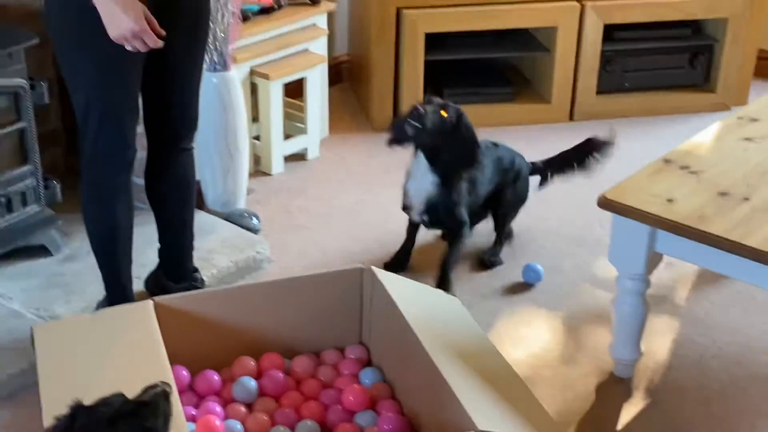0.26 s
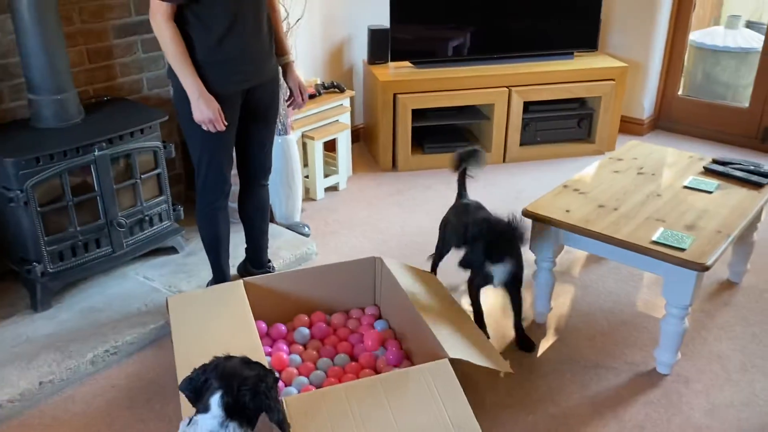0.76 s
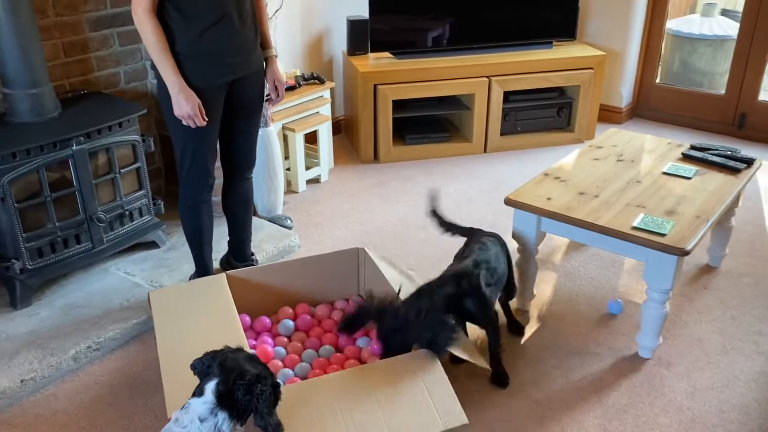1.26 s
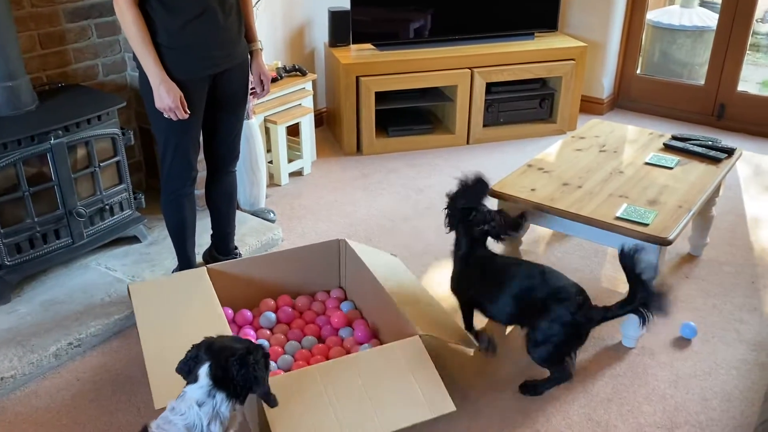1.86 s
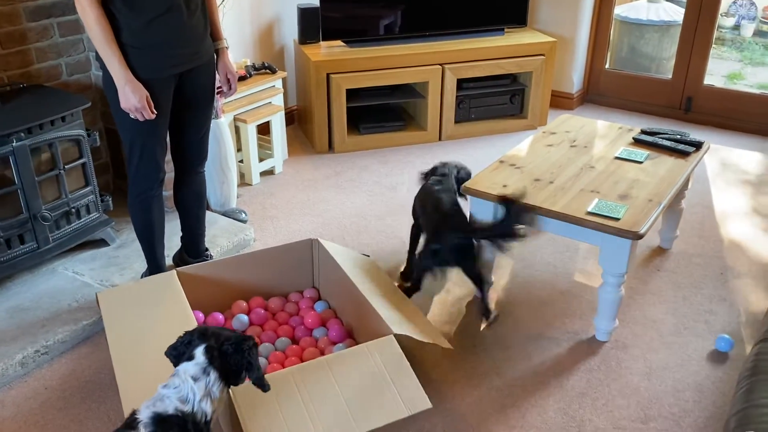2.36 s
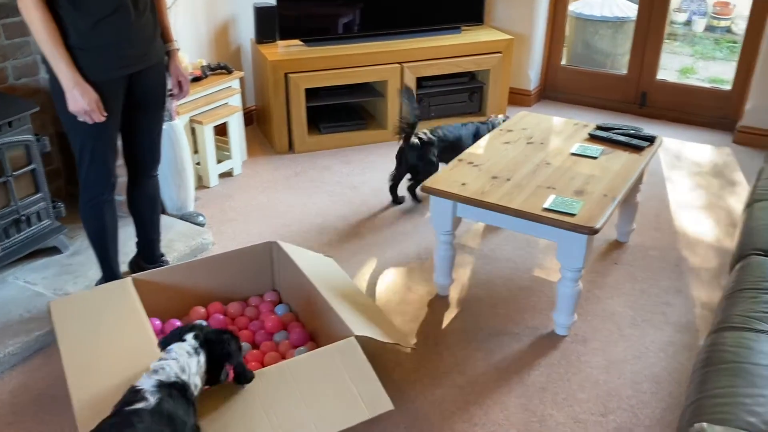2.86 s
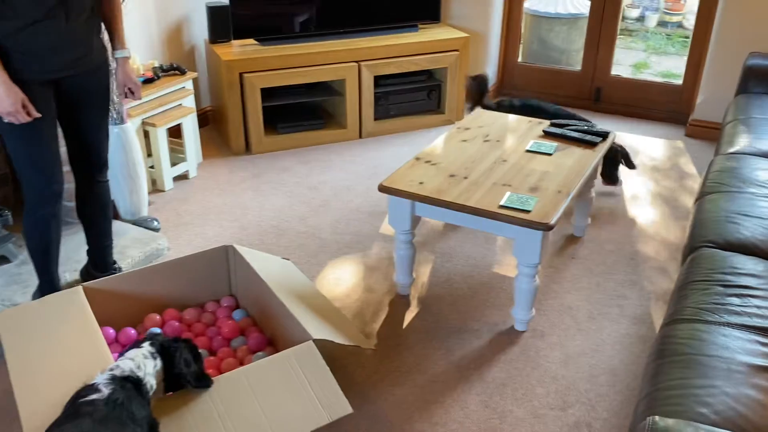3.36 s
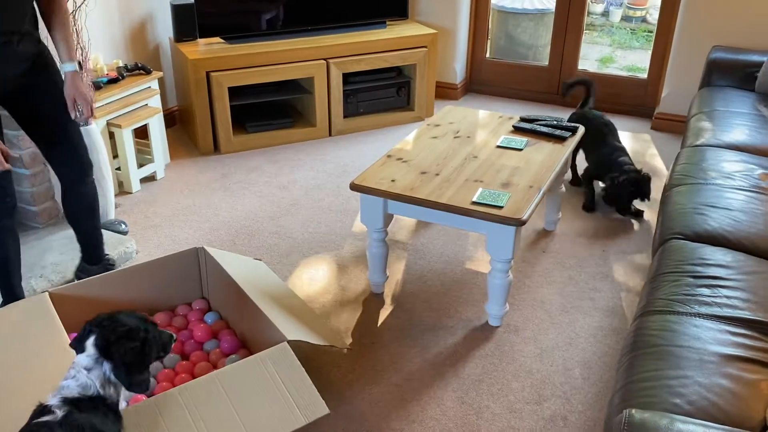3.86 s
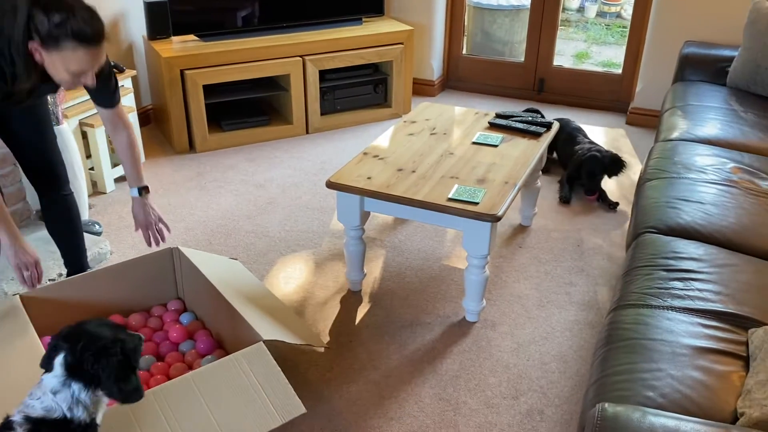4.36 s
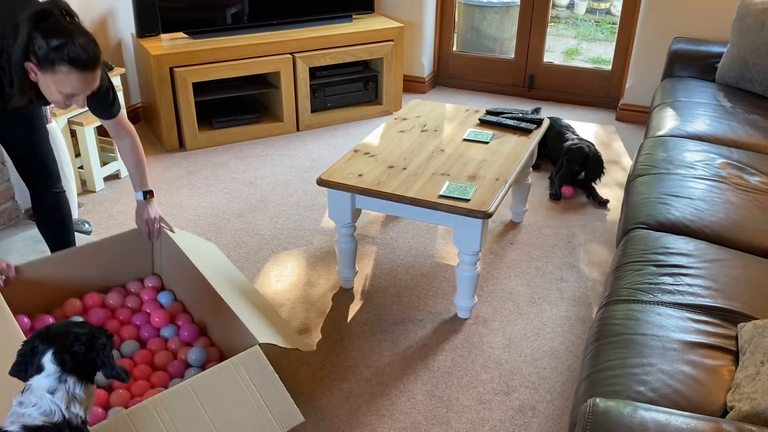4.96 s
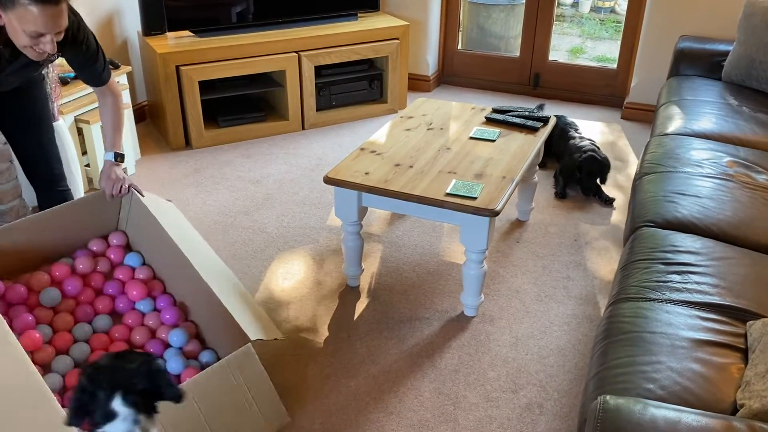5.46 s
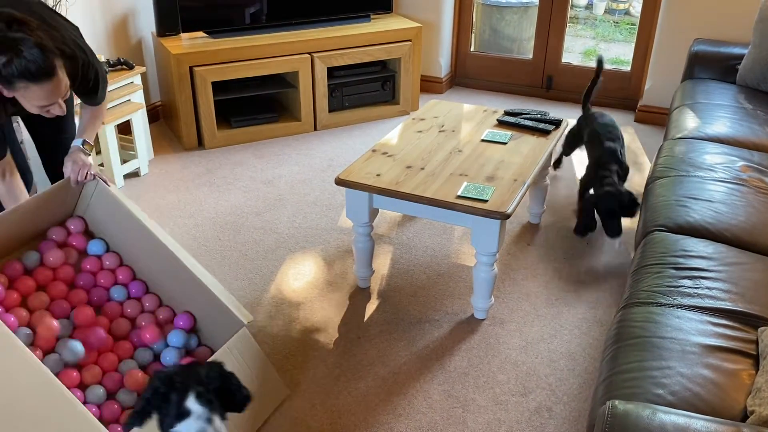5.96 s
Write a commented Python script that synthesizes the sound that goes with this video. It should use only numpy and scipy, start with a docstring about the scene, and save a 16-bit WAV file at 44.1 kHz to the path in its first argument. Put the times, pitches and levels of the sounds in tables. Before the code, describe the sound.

Faint room air runs throughout a small carpeted living room, picked up in stereo by a handheld microphone near the box. Very soft paw scuffs open it; at 0.47 s a hollow plastic ball gives a bright tick. At about 0.78 s a sharp plastic click lands with a cardboard thud, followed by paw thumps near 0.9 s. From 1.05 to 1.35 s a quick flurry of hard, boomy cardboard knocks comes with hollow ball clacks, then a raspy scrape around 1.5 s and a weaker one at 1.9 s. Tiny squeaks and claw scuffs at 2.0-2.4 s give way to quiet padding, with heavier muffled paw thuds at 3.6-4.2 s. From 4.5 s the cardboard is gripped with faint rustles; balls shift at 5.1 s, a short squeak comes at 5.4 s, knocks thicken at 5.7 s, and from 6 s hollow clacking and drumming surge, still loud at the end.

```python
"""A carpeted living room, heard by a two-port microphone; the room's faint air runs throughout.
Paws tread the carpet, a thrown ball ticks and lands on the flap of a big cardboard box of hollow plastic balls,
then a dog treads on the flap, scrapes along it and trots off. Last the box is gripped and tipped: the balls
shift, clack together and roll against the drumming cardboard. Panels, boards and shells are damped modes,
trapped air and floor are low resonances, and rubbing surfaces are coloured showers of tiny impacts."""
import sys
import numpy as np
from scipy import signal
from scipy.fft import rfft, irfft
from scipy.io import wavfile
from scipy.ndimage import uniform_filter1d

SR = 44100
rng = np.random.default_rng(int(sys.argv[2]) if len(sys.argv) > 2 else 0)


def to_wav(sig):
    """Store sig (one row per channel, or 1-D mono) as 16-bit WAV at the path in sys.argv[1].

    Samples outside -1..1 are clipped; the rate is SR.
    """
    pcm = np.clip(np.atleast_2d(sig), -1, 1) * 32767
    pcm = np.round(pcm).astype(np.int16)
    wavfile.write(sys.argv[1], SR, pcm.T)  # frames by channels


N = 273420
T = np.arange(N) / SR
HIT_T = T[:SR // 2]  # time axis of a single blow, half a second

# Levels in the tables are relative: each layer adds its own mixing gain.
# Air of the room. Each row: frequency in Hz, level in dB.
AMBIENCE_COLOUR = [(18, -40), (30, -15.5), (97, 9), (662, -20), (859, -10.5), (2130, -20.5), (7630, -31.5),
                   (9150, -37.5), (11900, -27.5), (15000, -55)]
# Room reflections. Each row: frequency in Hz, decay T60 in s, strength in dB, correlation of the ports.
ROOM_BANDS = [(80.6, 0.17, -1, 0.98), (240, 0.39, -3.5, 0.8), (605, 0.37, -2.5, -0.2),
              (1160, 0.38, 0, -0.56), (4080, 0.11, -1.5, 0.3), (8700, 0.15, 1.1, -0.1)]

# Feet moving about on the carpet. Each row: start in s, length in s, level in dB.
SHUFFLES = [(0.0, 0.5, -61.5), (2, 0.49, -64), (2.574, 0.81, -59.5), (3.442, 0.72, -55)]
# Rub of the carpet. Each row: frequency in Hz, level in dB.
CARPET_COLOUR = [(76, -65.5), (130, -23.5), (292, 1), (474, -6), (657, -7.5), (960, -16.5), (1220, -17),
                 (2120, -21), (8000, -41.5), (10400, -62), (17600, -120)]
# Paws on the carpet. Each row: start in s, thud in dB, thud centre in Hz, scuff in dB, claw in dB.
STEPS = [(0.105, -68, 173, -64.5, -71), (0.173, -56, 490, -63.5, -71), (0.351, -56, 290, -70, -81),
         (0.725, -61, 284, -74, -80), (0.916, -39, 305, -43, -74), (0.964, -43.5, 268, -53, -76),
         (2.154, -44.5, 316, -72, -57.5), (2.26, -55, 350, -64, -67), (2.295, -73, 400, -55, -69),
         (2.335, -79, 333, -55.5, -64.5), (2.413, -84, 285, -60, -60.5), (2.597, -59.5, 282, -63.5, -60.5),
         (2.766, -55, 400, -53, -83), (3.029, -54, 308, -69, -69), (3.191, -57.5, 494, -62, -72.5),
         (3.229, -64, 490, -59.5, -66), (3.258, -54.5, 283, -76, -60), (3.278, -57, 301, -60.5, -80),
         (3.565, -44.5, 265, -59.5, -73), (3.623, -51, 490, -63, -68), (3.775, -46, 300, -52.5, -70),
         (3.786, -40, 262, -60, -63), (3.812, -44, 270, -81, -68), (4.016, -52.5, 500, -49, -66),
         (4.041, -46.5, 320, -57, -61), (4.091, -47, 294, -53.5, -60), (4.168, -47.5, 266, -51, -68),
         (4.202, -50.5, 331, -59, -90)]
# Weight coming down on the floor. Each row: start in s, level in dB.
FOOTFALLS = [(0.212, -53), (0.538, -50.5), (0.834, -32.5), (2.662, -53), (2.846, -52), (2.912, -58.5),
             (3.645, -40), (3.806, -37), (3.881, -44), (4.039, -54)]
# Modes of the carpeted floor under a paw. Each row: nominal Hz, level in dB, share of the ring time.
BOARD_MODES = [(135, -7.5, 0.24), (178, 1.5, 0.42), (216.6, -5.5, 1.0), (267.6, -2.5, 0.9),
               (307.3, -0.5, 0.89), (376.4, -5, 1), (430, -6.5, 0.99), (543, 8, 0.18), (668, -7, 0.8),
               (770, -10, 0.29)]
# Scuff of a paw. Each row: frequency in Hz, level in dB.
SCUFF_COLOUR = [(400, -17.5), (750, 11), (1000, 3.5), (1350, 2.5), (1800, -5), (2600, -19), (4000, -30)]
# Scratch of a claw. Each row: frequency in Hz, level in dB.
CLAW_COLOUR = [(1400, -19), (3000, 6), (4500, 0.5), (7000, -7), (11000, -14.5), (16000, -18.5)]

# Fur, cloth or card sliding. Each row: start in s, length in s, level in dB.
SWISHES = [(0.542, 0.061, -67), (1.276, 0.33, -52), (1.776, 0.1, -49), (2.813, 0.049, -52.5),
           (2.878, 0.11, -57), (3.403, 0.16, -62.5), (4.49, 0.21, -53), (4.86, 0.097, -54),
           (5.096, .4, -52), (5.955, 0.08, -51)]
# Hiss of sliding surfaces. Each row: frequency in Hz, level in dB.
BRUSH_COLOUR = [(1200, 5.2), (3000, 6.2), (5000, 3.1), (7300, 6.9), (11000, 7.1), (16000, 4.1)]
# Squeaks; the first is the flap singing on its panel mode. Each row: middle in s, pitch in Hz, length in s,
# level in dB, glide and waver as shares of the pitch.
SQUEAKS = [(2.065, 622, 0.088, -49.5, 0.04, 0.024), (2.185, 852, 0.067, -48, 0.041, 0.044),
           (2.283, 821, 0.074, -52.5, 0.11, 0.095), (2.312, 1112, 0.068, -54, 0.086, 0.125),
           (2.362, 1270, 0.039, -55, 0.034, 0.122), (2.975, 666, 0.053, -61, -0.051, 0.05),
           (3.008, 641, .035, -50.5, -0.12, 0.095), (4.21, 1272, 0.053, -53, 0.0067, 0.056),
           (4.225, 1030, 0.084, -54, 0.047, 0.04), (5.409, 910, 0.079, -47, -0.063, 0.133)]
# A claw flicks a hard edge. Each row: start in s, level in dB.
FLICKS = [(2.335, -61)]
# Tick of the flick. Each row: frequency in Hz, level in dB.
FLICK_COLOUR = [(2500, -11), (4500, -12), (6200, 1), (8000, 7), (11000, -11), (13000, -25), (16000, -36)]

# One ball struck in the open. Each row: start in s, level in dB.
BALL_TICKS = [(0.4694, -41.5)]
# Broad resonances of its thin shell. Each row: frequency in Hz, level in dB.
SHELL_COLOUR = [(1900, -8), (2400, 1), (2620, 11), (2900, 9), (3350, -1), (4150, 4), (5000, -21),
                (6800, -5), (8000, -15), (11300, -19), (15000, -32.5)]
# Ringing modes of that shell. Each row: nominal Hz, level in dB, T60 in s.
SHELL_MODES = [(2500, -9, .14), (2640, 0, 0.15), (3015, -7, 0.13), (2890, 4, 0.17), (3420, -3, 0.13),
               (4400, -14, 0.17), (5373, -17, 0.14), (6800, -18, 0.19), (9920, -22, .2), (11500, -20, 0.24)]

# Dog scraping along the flap. Each row: time in s, panel in dB, friction in dB.
SCRAPE = [(1.36, -40, -40.5), (1.452, -33.5, -39), (1.49, -25.5, -31.5), (1.556, -40, -41),
          (1.814, -50.5, -52), (1.906, -30.5, -37), (2.016, -46.5, -62), (2.368, -59.5, -56),
          (2.5, -90, -92)]
# Panel under the scrape. Each row: frequency in Hz, level in dB.
SCRAPE_BODY = [(65, -60), (110, -13), (130, -16), (193, 8), (230, -4), (280, 7.5), (314, 3.5), (346, 1),
               (378, 6), (424, 3.5), (520, -17.5), (630, -10), (727, -35), (943, -61), (1100, -42),
               (1430, -85), (2420, -120)]
# Rasp of the scraped surface. Each row: frequency in Hz, level in dB.
SCRAPE_GRIT = [(380, 5), (650, 1.5), (863, -1), (939, -0.5), (1160, -6.5), (1520, -9.5), (2920, -23),
               (7280, -32), (8000, -22.5), (10400, -73), (17600, -120)]
# Blows on the cardboard. Each row: start in s, panel in dB, panel centre in Hz, boom in dB, crack in dB,
# base ring time in s.
KNOCKS = [(0.779, -21.5, 320, -34.5, -33, 0.15), (1.056, -27, 362, -33, -28.5, 0.13),
          (1.083, -25, 146, -28, -54, 0.097), (1.124, -18.5, 358, -22, -37, 0.067),
          (1.161, -26.5, 300, -28.5, -41.5, 0.079), (1.207, -25.5, 390, -44, -43.5, 0.078),
          (1.245, -35, 406, -31, -48.5, 0.082), (1.283, -40, 360, -55, -58, 0.044),
          (1.324, -23.5, 320, -14, -47.5, 0.21), (1.342, -27.5, 172, -21, -46, 0.07),
          (1.392, -37.5, 425, -51, -45.5, 0.093), (1.477, -51, 260, -54, -49, 0.086),
          (1.511, -49, 420, -54, -52, .1), (1.562, -40, 423, -43, -42, 0.082),
          (1.685, -35, 275, -29.5, -47, 0.21), (1.825, -41, 271, -41, -49.5, 0.58),
          (1.963, -38, 318, -32, -56, 0.096), (2.049, -56, 400, -66, -60, 0.076),
          (2.111, -45.5, 330, -71, -55, 0.13), (4.529, -57, 175, -43.5, -68, 0.17),
          (4.629, -54, 177, -40, -64, 0.35), (4.831, -49.5, 210, -65, -62, 1),
          (4.971, -40.5, 155, -53, -73, 0.26), (5.02, -46.5, 384, -48, -52.5, 0.13),
          (5.094, -38, 343, -36.5, -43.5, 0.18), (5.162, -45, 330, -41, -42, 0.099),
          (5.219, -44.5, 169, -31, -47, 0.31), (5.405, -40, 273, -41.5, -41.5, 0.41),
          (5.607, -37.5, 302, -56, -46, 0.051), (5.686, -28, 284, -44, -47.5, 0.09),
          (5.694, -29.5, 330, -31.5, -45, 0.22), (5.737, -33, 320, -32.5, -45, 0.15),
          (5.783, -32.5, 262, -43, -44, 0.06), (5.819, -40, 278, -47, -71, 0.43),
          (5.839, -45, 424, -55, -52, 0.044), (5.88, -51, 320, -46, -50.5, 0.13),
          (5.951, -35, 332, -46, -55, 0.19), (5.908, -32, 316, -32, -42.5, 0.06),
          (5.927, -31.5, 313, -37, -44.5, 0.21), (5.985, -27, 400, -53, -39.5, 0.12),
          (6.009, -30.5, 380, -50, -38.5, 0.12), (6.037, -26.5, 314, -26.5, -40, 0.11),
          (6.049, -28.5, 343, -44, -41.5, 0.2), (6.072, -33, 340, -56, -45, 0.068),
          (6.122, -25.5, 295, -30.5, -39, 0.23), (6.189, -24.5, 256, -47, -37, 0.23)]
# Cardboard panel modes. Each row: nominal Hz, level in dB, share of the ring time.
PANEL_MODES = [(133, -12.5, 1.7), (153.5, -3.5, 1.1), (187.8, -1.5, 0.68), (203.7, -6.5, 1.2),
               (255, -0.5, 0.99), (308.5, 1, 0.72), (341.8, -0.5, 0.48), (376, -7, 2.1), (422, -4, 0.57),
               (470.6, 0, 0.55), (576, -3.5, 0.61), (633.7, -2.5, 1.06), (839, -20, 1), (1010, -7.5, 0.36),
               (1273, -13.5, 0.24), (1573, -10, 0.52)]
# Card cracking. Each row: frequency in Hz, level in dB.
CRACK_COLOUR = [(350, -22), (750, 9.5), (1000, 2), (1350, -1), (1900, -6), (2600, -22), (4000, -32)]
# Card snapping. Each row: frequency in Hz, level in dB.
SNAP_COLOUR = [(1400, 7.5), (2800, 3.5), (4200, 2), (5500, -9.5), (7500, -6.5), (11000, -18.5),
               (16000, -20)]

# Sharp clicks of hard plastic. Each row: start in s, level in dB.
CLICKS = [(0.7731, -34), (0.777, -26.5), (2.604, -52), (3.271, -54), (4.043, -50), (4.093, -55),
          (3.603, -55), (3.653, -58), (3.7841, -43), (5.6057, -54), (5.6935, -44), (5.86, -37), (5.99, -27),
          (6.1205, -36)]
# Colour of those clicks. Each row: frequency in Hz, level in dB.
CLICK_COLOUR = [(500, -35), (2000, 7.5), (5000, -1), (16000, -1)]
# Hard knocks on a ball, loose or in the pile. Each row: start in s, nominal lowest mode in Hz, level in dB.
CLACKS = [(1.055, 772, -36.5), (1.056, 1284, -46), (1.126, 606, -26), (1.209, 624, -33.5),
          (1.246, 627, -47.5), (1.325, 620, -39.5), (1.481, 939, -36), (1.496, 920, -39.5),
          (1.511, 965, -38.5), (2.618, 783, -63), (2.767, 688, -53), (2.77, 1215, -65), (3.001, 636, -62.5),
          (3.194, 599, -60.5), (3.516, 764, -66.5), (3.568, 646, -56.5), (3.625, 780, -53.5),
          (4.018, 787, -58), (4.042, 786, -53), (4.088, 740, -60), (4.16, 769, -47.5), (4.163, 1286, -57.5),
          (4.976, 653, -49), (5.045, 628, -45.5), (5.07, 654, -45), (5.122, 720, -59), (5.103, 762, -54),
          (5.17, 720, -67), (5.264, 700, -53), (5.394, 960, -58), (5.422, 813, -48), (5.481, 774, -44.5),
          (5.607, 680, -54), (5.694, 657, -39), (5.735, 880, -53), (5.786, 650, -47), (5.906, 690, -59),
          (5.987, 786, -42), (6.061, 750, -44), (6.083, 727, -49), (6.124, 581, -39), (6.157, 810, -52),
          (6.19, 725, -38)]
# Hollow ring of a knocked ball, before its pitch is shifted. Each row: frequency in Hz, level in dB, T60 in s.
HOLLOW_MODES = [(695.8, 4.5, 0.087), (1100, -0.5, 0.037), (1447, -8.5, 0.05), (1880, -14, 0.027),
                (2520, -17, 0.019)]
# Balls tumbling against the wall of the box. Each row: middle of the push in s, level in dB.
BUMPS = [(5.0963, -42), (5.1231, -27), (5.6962, -23), (5.7055, -32), (5.7225, -26), (5.7467, -28),
         (5.9896, -11), (5.9963, -12.5), (6.0384, -19), (6.051, -20), (6.0634, -34), (6.135, -20),
         (6.148, -21), (6.166, -15.5)]
# The box tips and the balls roll. Each row: time in s, drumming, shell clatter and bright ticks in dB.
TIP = [(4.48, -80, -83.5, -103), (4.57, -62, -60, -83), (4.704, -58, -62.5, -77), (4.914, -53, -60.5, -77),
       (5.092, -38.5, -52, -66), (5.28, -52.5, -53.5, -72), (5.456, -44, -63.5, -60),
       (5.734, -46.5, -59, -104), (5.84, -35, -58.5, -66), (5.988, -32, -55, -66), (6.088, -35, -56, -70),
       (6.2, -32, -48, -56)]
# Box drumming under the pile. Each row: frequency in Hz, level in dB.
PILE_BODY = [(53, -23.5), (90, -3.5), (108, -13), (178, -0.5), (251, 4), (291, 6), (333, -5), (374, -5),
             (433, -1.5), (475, 0), (569, -16), (631, -10.5), (724, -19.5), (787, -35), (1100, -20.5),
             (1430, -56), (2420, -120)]
# Clatter of the shells. Each row: frequency in Hz, level in dB.
PILE_CLATTER = [(400, -32), (700, -14), (1170, -3.5), (1950, -8.5), (2700, -20.5), (4000, -21.5),
                (5700, -25.5), (7500, -19.5), (11000, -27), (16000, -32)]
# Thin shells glancing off each other. Each row: frequency in Hz, level in dB.
GLANCE_COLOUR = [(1900, -13), (2600, 17), (3400, 11), (4500, 8), (5600, 0), (7800, 7), (11000, -20),
                 (15000, -39)]

FLOOR_HZ, FLOOR_T60 = 72.5, 0.19  # whole floor: Hz, s
STEP_T60, PAW_DRAG_T60 = 0.28, 0.31  # s; each paw drags a little on the pile of the carpet
SWISH_ATTACK_S, SWISH_T60 = 0.062, 0.25
BOX_AIR_HZ, BOX_AIR_T60 = 79, 0.36  # air in the box: Hz, s
SNAP_GROWTH = 0.2  # extra dB of snap for each dB of crack: only hard blows crease the card
BUMP_HZ = 376  # the contact lasts about one cycle of this
HARD_BIAS = 0.19  # how much more a hard collision rings a shell than a soft one
PILE_CENTRE_HZ, PILE_RING_S = 275, 0.17  # panels under the rolling balls: Hz, base ring time in s
TREBLE_SPLIT_HZ, TREBLE_LAG_S, TOP_HZ = 6200, .000227, 15800


def amp(db):
    """Decibels to gain."""
    return 10 ** (np.asarray(db) / 20)


def unit(x):
    """Scale to an rms of one."""
    return x / np.sqrt(np.mean(x ** 2))


def unit_attack(x):
    """Scale a blow to an rms of one over its first 30 ms."""
    return x / np.sqrt(np.mean(x[HIT_T < .03] ** 2))


def fade(t60):
    """Exponential decay of a blow, 60 dB in t60 seconds."""
    return np.exp(-np.log(1000) * HIT_T / max(t60, 1e-3))


def add(track, s, sound):
    """Mix a sound in at time s."""
    start = max(int(s * SR), 0)
    track[start:start + len(sound)] += sound[:N - start]


def gains(rows):
    """Each dB column of a curve as a gain over time, faded to silence outside its span."""
    s, *columns = np.transpose(rows)
    gate = np.interp(T, [s[0] - .02, s[0], s[-1], s[-1] + .05], [0, 1, 1, 0])
    return [gate * amp(np.interp(T, s, c)) for c in columns]


def stroke(s, length, attack_s, t60):
    """Envelope that rises at time s, holds and dies away from s + length."""
    rise = np.clip((T - s) / attack_s, 0, 1)
    return rise * np.exp(-np.log(1000) * np.maximum(T - s - length, 0) / t60)


def colour(x, points):
    """Causal minimum-phase filter with the given (Hz, dB) outline."""
    size = 8192
    hz, db = np.transpose(points)
    bins = np.arange(size // 2 + 1) * SR / size
    log_gain = np.log(amp(np.interp(np.log(bins + 1), np.log(hz + 1), db)))
    cepstrum = irfft(log_gain)[:size // 2]
    cepstrum[1:] *= 2  # folding the cepstrum makes the filter causal
    response = irfft(np.exp(rfft(cepstrum, size)))
    return signal.fftconvolve(x, response)[:len(x)]


def ring(modes, scatter_db):
    """Damped modes; every contact point weights and signs them differently and nudges their pitch."""
    out = 0
    for hz, db, t60 in modes:
        weight = rng.choice([-1, 1]) * amp(db + scatter_db * rng.standard_normal())
        pitch = hz * (1 + 0.011 * rng.standard_normal())
        out = out + weight * fade(t60) * np.sin(2 * np.pi * pitch * HIT_T)
    return out


def struck(table, centre, t60, focus_db):
    """A blow favours the modes near a centre set by the hardness and place of the contact."""
    modes = []
    for hz, db, share in table:
        loss = min(focus_db * np.log2(hz / centre) ** 2, 21)
        modes.append((hz, db - loss, t60 * share))
    return unit_attack(ring(modes, scatter_db=-1.0) * (1 - np.exp(-HIT_T / 0.0048)))


def contacts(rate, spread_db):
    """Random tiny impacts of uneven size, on average rate a second."""
    size = amp(spread_db * np.clip(rng.standard_normal(N), -2, 2)) * rng.choice([-1, 1], N)
    struck_now = rng.random(N) < rate / SR
    return unit(size * struck_now / np.sqrt(rate))


def boom(push, hz, width_hz):
    """A resonance driven by many small pushes, filtered twice."""
    b, a = signal.iirpeak(hz, hz / width_hz, fs=SR)
    return unit(signal.lfilter(b, a, signal.lfilter(b, a, push)))


def crackle(points, t60, rise_s):
    """Fibres giving way: a coloured burst of grains that quickly dies."""
    grains = contacts(7000, 5.7)[:len(HIT_T)]
    envelope = fade(t60) * (1 - np.exp(-HIT_T / rise_s))
    return unit_attack(colour(grains * envelope, points))


def thump(hz, t60, rise_s, below_hz=50):
    """A low resonance swells just after a blow; a high-pass thins it below below_hz."""
    swing = np.sin(2 * np.pi * hz * HIT_T) * fade(t60) * (1 - np.exp(-HIT_T / rise_s))
    highpass = signal.butter(2, below_hz, "high", fs=SR, output="sos")
    return signal.sosfilt(highpass, unit_attack(swing))


def catching(spread_db, slip_s):
    """A sliding surface catches and lets go: a random gain averaged over slip_s."""
    wander = uniform_filter1d(rng.standard_normal(N), max(int(slip_s * SR), 1))
    return unit(amp(spread_db * unit(wander)))


def diffuse(size):
    """Noise from all sides, its likeness at the two ports set for each frequency by the room table."""
    hz, _, _, alike = np.transpose(ROOM_BANDS)
    mid, side = rfft(rng.standard_normal((2, size)))
    likeness = np.clip(np.interp(np.arange(len(mid)) * SR / size, hz, alike), -1, 1)
    common = np.sqrt((1 + likeness) / 2) * mid
    opposed = np.sqrt((1 - likeness) / 2) * side
    return irfft(common + np.array([[1], [-1]]) * opposed, size)


def room(x, wet_db):
    """Direct sound and the reflections of the furnished room; every call draws its own echoes."""
    hz, t60, db, _ = np.transpose(ROOM_BANDS)
    size = len(HIT_T)
    field = rfft(diffuse(size))
    bins = np.log(np.arange(size // 2 + 1) * SR / size + 1)
    tail = 0
    for share, decay, gain in zip(np.eye(len(hz)), t60, amp(db + wet_db)):
        envelope = fade(decay) * np.clip(HIT_T / 0.00048, 0, 1)
        band = irfft(field * np.interp(bins, np.log(hz), share), size)
        tail = tail + gain * band * envelope / np.sqrt(np.sum(envelope ** 2))
    return x + signal.fftconvolve(x[None], tail, axes=1)[:, :N]


def ambience():
    """The air of the room: steady coloured noise from all sides."""
    return np.array([unit(colour(side, AMBIENCE_COLOUR)) for side in diffuse(N)])


def shuffling(rumble_db=-5, rub_db=-11, drag_db=-11):
    """Feet rub the carpet and rumble the floor while they move about; every scuff trails off in a drag."""
    moving = sum(amp(db) * stroke(s, length, attack_s=0.067, t60=0.82) for s, length, db in SHUFFLES)
    drag = sum(amp(scuff) * stroke(s, 0, attack_s=0.022, t60=PAW_DRAG_T60) for s, _, _, scuff, _ in STEPS)
    rumble = amp(rumble_db) * moving * boom(contacts(190, 4.1), 57, 55)
    rub = amp(rub_db) * moving + amp(drag_db) * drag
    return rumble + rub * unit(colour(contacts(900, 3.4), CARPET_COLOUR))


def steps(thud_db=-1, floor_db=-12, scuff_db=-4, claw_db=-6, weight_db=-3):
    """Each paw thuds on the boards, shakes the whole floor and scuffs the carpet; heavy footfalls only boom."""
    out = np.zeros(N)
    for s, body, centre, scuff, claw in STEPS:
        add(out, s, amp(body + thud_db) * struck(BOARD_MODES, centre, 0.56 * STEP_T60, focus_db=4.0))
        add(out, s, amp(body + floor_db) * thump(FLOOR_HZ, FLOOR_T60, rise_s=0.0068))
        add(out, s, amp(scuff + scuff_db) * crackle(SCUFF_COLOUR, 0.98 * STEP_T60, rise_s=0.0016))
        add(out, s, amp(claw + claw_db) * crackle(CLAW_COLOUR, STEP_T60, rise_s=0.0034))
    for s, db in FOOTFALLS:
        add(out, s, amp(db + weight_db) * thump(FLOOR_HZ, FLOOR_T60, rise_s=0.0048))
    return out


def swishes(brush_db=-6.0):
    """Sliding surfaces hiss with fine grains while they move, then die away."""
    slide = sum(amp(db) * stroke(s, length, SWISH_ATTACK_S, SWISH_T60) for s, length, db in SWISHES)
    hiss = unit(colour(contacts(2500, 2.6), BRUSH_COLOUR))
    return amp(brush_db) * slide * catching(1.9, slip_s=.006) * hiss


def squeaks(squeak_db=-1, waver_s=0.0026):
    """Rubbing paws, plastic and card squeak: stick and slip at a gliding, unsteady pitch. The first tone, at
    2.065 s, is the flap's cardboard singing on its panel mode near 626 Hz."""
    out = np.zeros(N)
    for s, hz, length, db, glide, waver in SQUEAKS:
        size = int(length * SR)
        noise = rng.standard_normal((2, len(HIT_T)))
        drift, grip = (unit(uniform_filter1d(row, int(waver_s * SR)))[:size] for row in noise)
        pitch = hz * (1 + glide * np.linspace(-.5, .5, size) + waver * drift)
        slips = np.sin(2 * np.pi * np.cumsum(pitch) / SR) * amp(0.78 * grip)
        add(out, s - length / 2, amp(db + squeak_db) * np.hanning(size) * unit(slips))
    return out


def flicks(t60=0.17):
    """A claw slips off a hard edge with a thin, bright tick."""
    out = np.zeros(N)
    for s, db in FLICKS:
        add(out, s, amp(db) * crackle(FLICK_COLOUR, t60, rise_s=.0005))
    return out


def ball_tick(shell_db=-13, modes_db=-18, tap_db=-8, tick_db=-15):
    """A hollow ball is struck: a sharp tick and a dull tap, and its thin shell buzzes and rings briefly."""
    tap_colour = [(100, -4.5), (300, -6.5), (900, -13.5), (2000, -25.5), (4200, -31), (6000, -39), (12000, -45)]
    tick_colour = [(1000, 5), (4000, -4), (7500, 5), (15000, -18.5)]
    out = np.zeros(N)
    for s, db in BALL_TICKS:
        tap = amp(tap_db) * crackle(tap_colour, 0.33, rise_s=0.00075)
        tick = amp(tick_db) * crackle(tick_colour, 0.0039, rise_s=0.0001)
        buzz = amp(shell_db) * crackle(SHELL_COLOUR, 0.33, rise_s=0.0001)
        ringing = amp(modes_db) * unit_attack(ring(SHELL_MODES, scatter_db=1.0))
        add(out, s, amp(db) * (buzz + ringing + tap + tick))
    return out


def scrape(panel_db=-3, air_db=-3, grit_db=-1):
    """Stick and slip on the flap drums the panel and the air behind it, and rasps the surface."""
    body, friction = gains(SCRAPE)
    slips = contacts(350, 1.9)
    grit = unit(colour(slips + 3.3 * contacts(4000, 3.6), SCRAPE_GRIT))
    drum = amp(panel_db) * unit(colour(slips, SCRAPE_BODY)) + amp(air_db) * boom(slips, BOX_AIR_HZ, 16.5)
    return body * drum + amp(grit_db) * friction * catching(2.7, slip_s=0.014) * grit


def knocks(panel_db=-1, air_db=-3, crack_db=-3, snap_db=-14, lead_s=.006):
    """Blows ring the panels, pump the air in the box and crack the card."""
    out = np.zeros(N)
    for s, body, centre, low, crack, t60 in KNOCKS:
        add(out, s, amp(body + panel_db) * struck(PANEL_MODES, centre, t60, focus_db=11.0))
        add(out, s, amp(low + air_db) * thump(BOX_AIR_HZ, BOX_AIR_T60, rise_s=0.014))
        # the surface crackles at first touch, just before the panel gives way
        add(out, s - lead_s / 2, amp(crack + crack_db) * crackle(CRACK_COLOUR, 1.6 * t60, rise_s=0.00088))
        snap = crack + snap_db + SNAP_GROWTH * (crack + 38.0)
        add(out, s - lead_s, amp(snap) * crackle(SNAP_COLOUR, 2.0 * t60, rise_s=0.004))
    return out


def clicks(click_db=-23, t60=0.033):
    """Hard plastic meets a hard edge: a very short burst with an abrupt start."""
    out = np.zeros(N)
    for s, db in CLICKS:
        add(out, s, amp(db + click_db) * crackle(CLICK_COLOUR, t60, rise_s=.0001))
    return out


def clacks(clack_db=-2, rise_s=0.0011):
    """One firm knock rings the hollow modes of a ball, pitched by how it is squeezed."""
    out = np.zeros(N)
    for s, lowest, db in CLACKS:
        modes = [(hz * lowest / HOLLOW_MODES[0][0], level, t60) for hz, level, t60 in HOLLOW_MODES]
        sound = ring(modes, scatter_db=0.5) * (1 - np.exp(-HIT_T / rise_s))
        add(out, s, amp(db + clack_db) * unit_attack(sound))
    return out


def bumps(bump_db=-3):
    """A tumbling ball gives the wall one short push."""
    out = np.zeros(N)
    for s, db in BUMPS:
        push = (np.pi * BUMP_HZ * (T - s)) ** 2
        out += amp(db + bump_db) * (1 - 2 * push) * np.exp(-np.minimum(push, 50))
    return out


def rolling_balls(pile_db=0, panel_db=-4, air_db=-22, air_growth=0.66, wall_db=-9, clatter_db=-1,
                  hollow_db=-2, tick_db=0, count=8):
    """The faster the pile moves, the more balls collide; each collision drums the box and knocks a shell."""
    body, clatter, bright = gains(TIP)
    low = body ** air_growth  # the boom of the air grows more slowly than the drumming
    rate = 190 + 70 * np.sqrt(body / body.max())  # collisions a second
    hits, hollow = np.zeros(N), np.zeros(N)
    for pitch in np.geomspace(.85, 1.18, count):  # balls squeezed differently ring differently
        own = contacts(rate / count, spread_db=3.5)
        hits += own
        hard = own * np.abs(own) ** HARD_BIAS  # the hardest collisions stand out as separate clacks
        modes = [(hz * pitch, db, t60) for hz, db, t60 in HOLLOW_MODES]
        hollow += signal.fftconvolve(hard, ring(modes, scatter_db=-10.5))[:N]

    drum = amp(pile_db) * unit(colour(hits, PILE_BODY)) + amp(wall_db) * boom(hits, 143, 74)
    panels = struck(PANEL_MODES, PILE_CENTRE_HZ, PILE_RING_S, focus_db=15)
    drum += amp(panel_db) * unit(signal.fftconvolve(hits, panels)[:N])
    air = amp(air_db) * boom(hits, 70.0, 36)
    shells = amp(clatter_db) * unit(colour(unit(hits) + contacts(3000, 2.9), PILE_CLATTER))
    shells += amp(hollow_db) * unit(hollow)
    ticks = amp(tick_db) * unit(colour(contacts(630, 1.2), GLANCE_COLOUR))  # thin shells glance off each other
    return body * drum + low * air + clatter * shells + bright * ticks


def scene():
    """Air, floor and box at the microphone, each group of sources with its own share of reflections."""
    floor = room(shuffling() + steps() + swishes() + squeaks() + flicks() + ball_tick(), wet_db=-1.0)
    flap = room(knocks(), wet_db=0.63)
    pile = room(scrape() + rolling_balls(), wet_db=1.7)
    plastic = room(clicks() + clacks(), wet_db=1.5)
    wall = room(bumps(), wet_db=3.5)
    return amp(-69.5) * ambience() + floor + flap + pile + plastic + wall


def record(dry):
    """The left port is stronger in the upper mids, the right in the bass. The treble of the right port
    feeds both channels, late and inverted on the left; deep bass and top are cut."""
    left_colour = [(70, -1.7), (250, -1), (600, 0), (1200, 1), (2300, 3), (4200, 2.2), (8000, 0)]
    left = colour(dry[0], left_colour)
    ports = rfft(np.array([left, dry[1]]), 2 * N)
    hz = np.arange(N + 1) * SR / (2 * N)
    late_inverted = -np.exp(-2j * np.pi * hz * TREBLE_LAG_S)
    treble = ports[1] * np.array([late_inverted, np.ones(len(hz))])
    share = np.clip((hz - TREBLE_SPLIT_HZ) / 500 + .5, 0, 1)  # crossover 500 Hz wide
    both = irfft((1 - share) * ports + share * treble)[:, :N]
    thinned = signal.sosfilt(signal.butter(4, 36, "high", fs=SR, output="sos"), both)
    return signal.sosfilt(signal.ellip(8, .2, 70, TOP_HZ, fs=SR, output="sos"), thinned)


dry = scene()
out = record(dry)
to_wav(out)
```